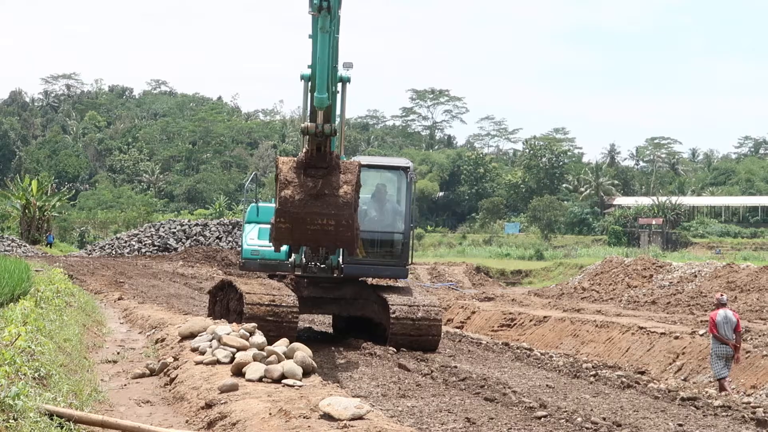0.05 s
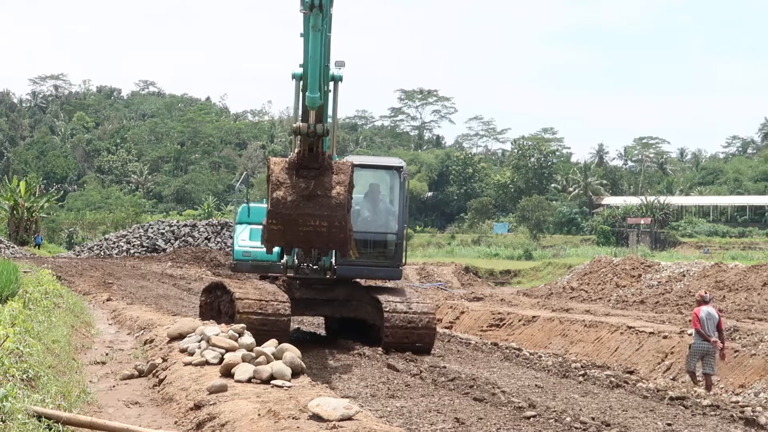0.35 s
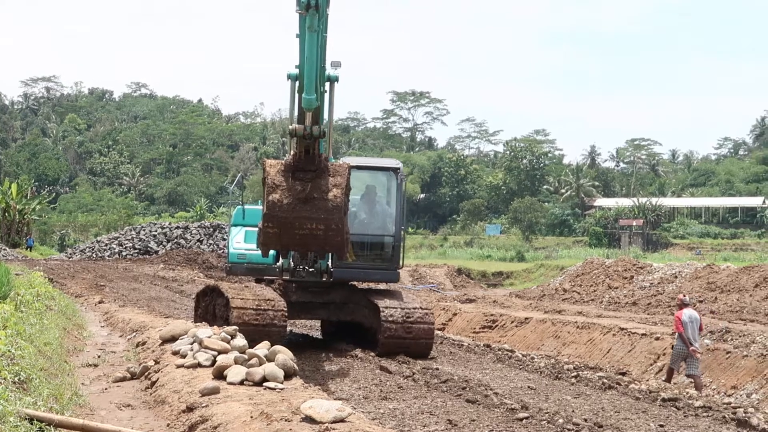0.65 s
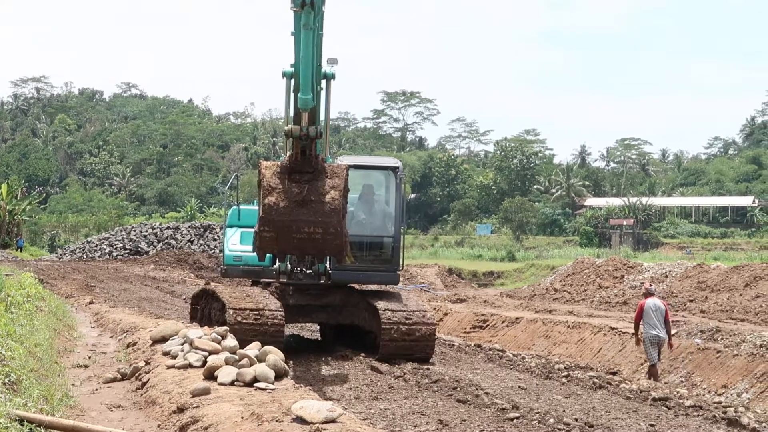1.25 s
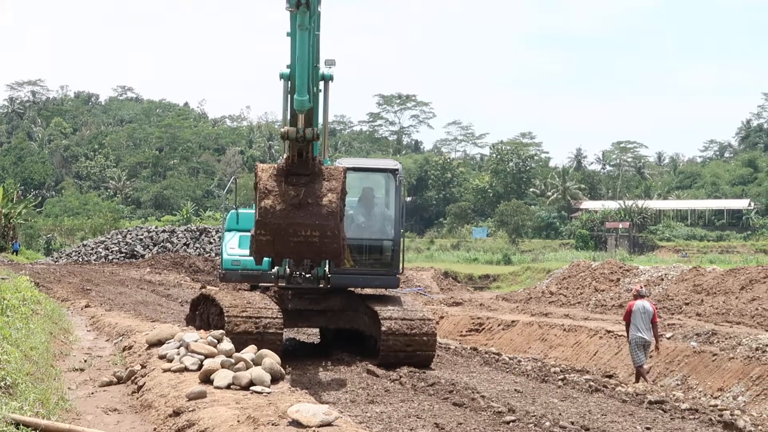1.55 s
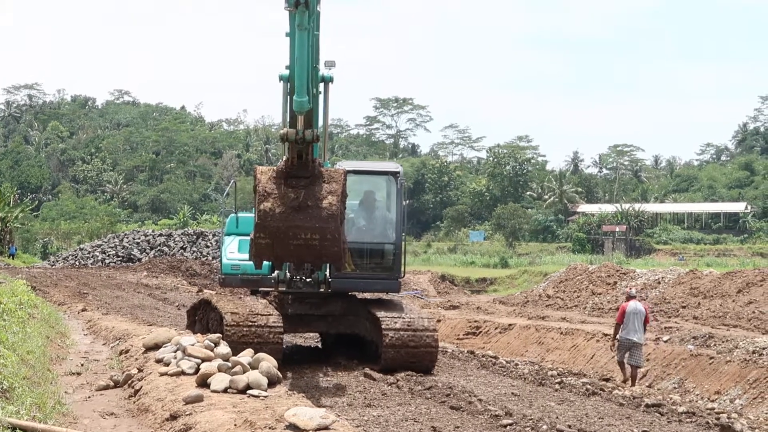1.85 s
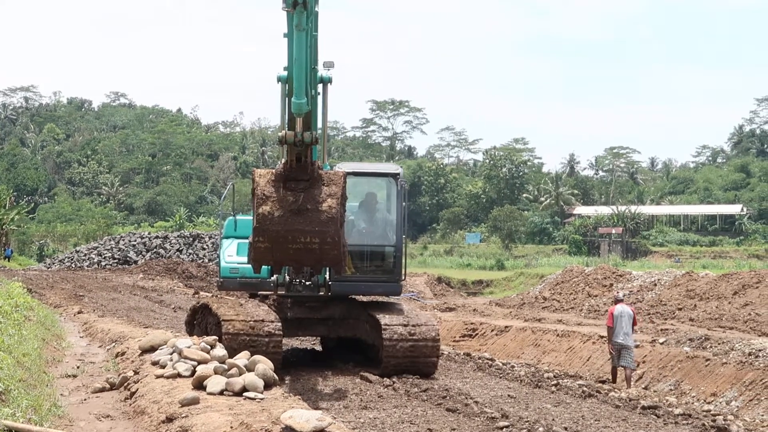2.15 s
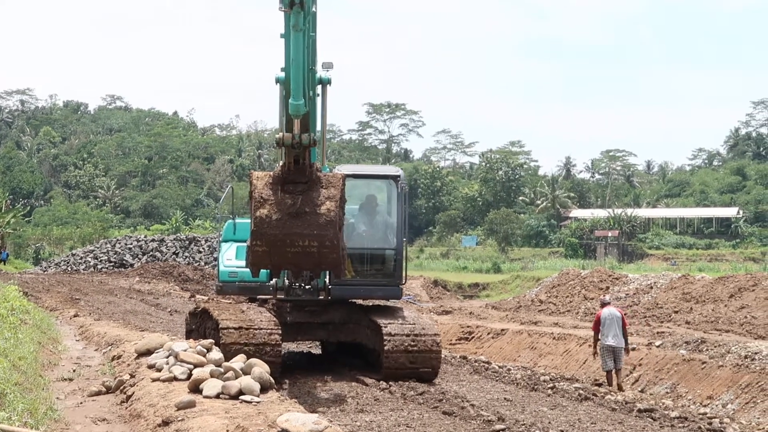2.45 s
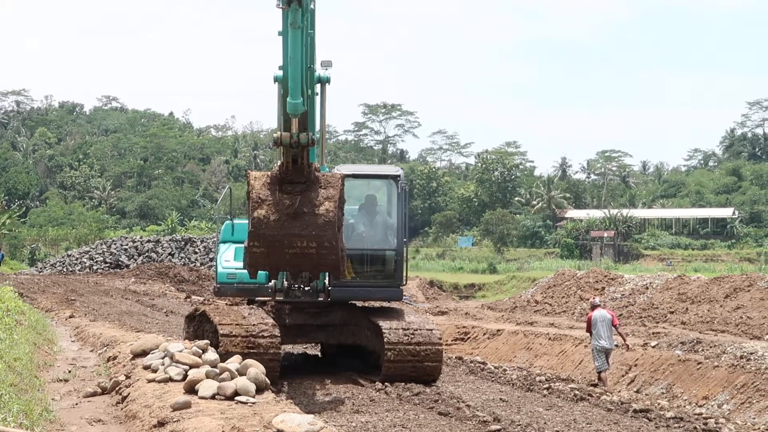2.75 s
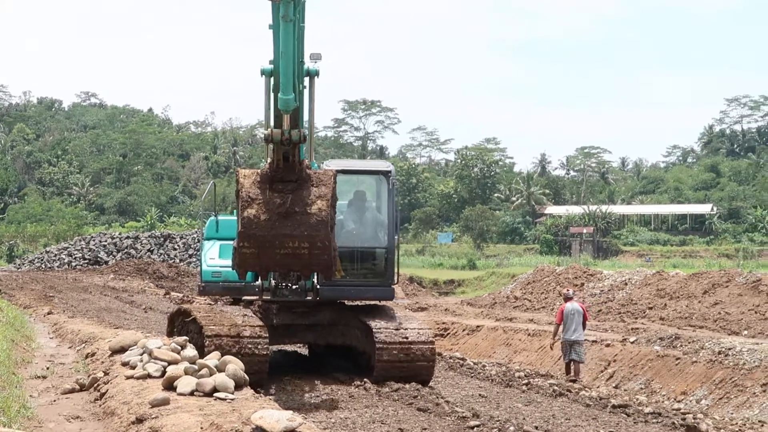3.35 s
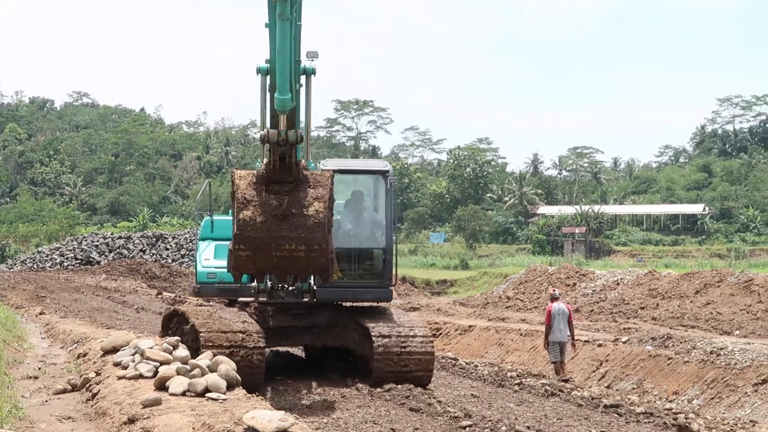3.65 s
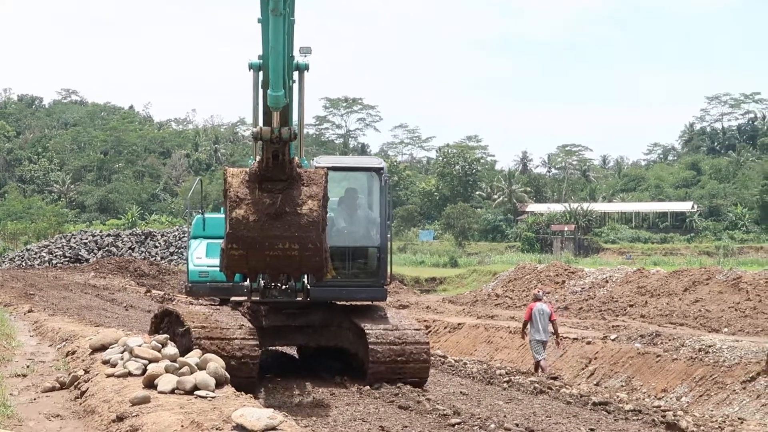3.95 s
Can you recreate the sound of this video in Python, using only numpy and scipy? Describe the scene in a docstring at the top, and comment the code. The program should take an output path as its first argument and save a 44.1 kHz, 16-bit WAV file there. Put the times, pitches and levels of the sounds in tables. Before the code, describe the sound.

Excavator rumbling along outdoors, its gears whining and steel tracks clattering, with one heavy thump.

```python
"""A steady diesel rumble, two gliding gear tones and rattling tracks: an excavator crawls over dirt.
The rumble throbs with each firing; each gear tone follows the speed of its track drive. Links clatter,
rollers grind, one squeals briefly, and steel shoes knock on stones and crush them. A heavy thump of the
undercarriage makes the gain control duck, and dull clanks of the links follow.
Light wind rumbles on the microphone."""
import sys
import numpy as np
from scipy import signal
from scipy.fft import rfft, irfft, next_fast_len
from scipy.io import wavfile
from scipy.ndimage import uniform_filter1d, minimum_filter1d, map_coordinates

SR = 44100
rng = np.random.default_rng(int(sys.argv[2]) if len(sys.argv) > 2 else 0)


def master(y):
    """Save y as 16-bit WAV."""
    cut = np.clip(np.atleast_2d(y).T, -1, 1)
    pcm = np.round(cut * 32767)  # scale
    wavfile.write(sys.argv[1], SR, pcm.astype(np.int16))


N = 176400


def amp(db):
    """Decibels to gain."""
    return 10 ** (np.asarray(db) / 20)


def unit(x):
    """Scale to rms 1."""
    return x / np.sqrt(np.mean(x ** 2) + 1e-20)


def along(points, hz):
    """Interpolate (Hz, value) points on a log frequency axis."""
    f, v = np.transpose(points)
    return np.interp(np.log(hz + 1), np.log(f + 1), v)


def clock():
    """Sample times in seconds."""
    return np.arange(N) / SR


def curve(rows):
    """Join (seconds, value) points by straight lines."""
    return np.interp(clock(), *np.transpose(rows))


def wobble(knots_per_s):
    """Smooth random curve, rms about 1."""
    return map_coordinates(rng.standard_normal(1024), [clock() * knots_per_s], mode="wrap")


def phase_of(hz):
    """Running phase of a frequency curve."""
    return 2 * np.pi * np.cumsum(hz) / SR


def tone(phase, db):
    """Sine at the given rms level."""
    return np.sqrt(2) * amp(db) * np.sin(phase)


def filtered(x, response):
    """Apply a frequency response by FFT."""
    size = next_fast_len(N + SR // 2)
    return irfft(rfft(x, size) * response(np.fft.rfftfreq(size, 1 / SR)), size)[..., :N]


def rush(spectrum, drive=1, correlation=None):
    """Stereo noise of rms 1, shaped in time by drive, then coloured."""
    # Each row: frequency in Hz, left-right correlation.
    default_correlation = [(30, .993), (70, .995), (150, .994), (300, .99), (550, .985), (1000, .94),
                           (1600, .82), (2100, .92), (4000, .96)]

    def response(hz):
        angle = np.arccos(np.clip(along(correlation or default_correlation, hz), -1, .9995)) / 2
        return amp(along(spectrum, hz)) * [np.cos(angle), np.sin(angle)]

    mid, side = filtered(rng.standard_normal((2, N)) * drive, response)
    return unit(np.array([mid + side, mid - side]))


def contacts(per_s, spread_db, life_s):
    """Envelope of many small random contacts."""
    onsets = rng.random(N) < per_s / SR
    power = onsets * amp(spread_db * np.minimum(rng.standard_normal(N), 2)) ** 2
    return np.sqrt(signal.lfilter([1], [1, -np.exp(-2 / (life_s * SR))], power))


def burst(start_s, db, t60_s, attack_s):
    """Envelope of one blow: quick rise, exponential decay."""
    t = np.maximum(clock() - start_s, 0)
    return amp(db - 60 * t / t60_s) * (1 - np.exp(-t / attack_s))


def ring(start_s, db, modes, attack_s):
    """Decaying modes of a struck body."""
    t = clock() - start_s
    return sum(burst(start_s, db + mode_db, t60_s, attack_s) * np.sin(2 * np.pi * hz * t)
               for hz, mode_db, t60_s in modes)


def hiss():
    """Faint, very wide hiss that swells as the machine nears."""
    # Each row: frequency in Hz, relative density in dB.
    spectrum = [(900, -9), (2200, -4), (3750, 3.5), (4200, 0.5), (5600, 2.5), (7600, -3), (10500, -1),
                (12000, -5), (14000, -7), (15200, -23.5)]
    # Each row: time in seconds, level in dB.
    level_db = [(.1, -55.5), (.8, -54.5), (1.3, -54), (2, -53.5), (2.5, -49.5), (3.1, -50.5), (3.45, -54.5),
                (3.75, -53), (4, -53.5)]
    return amp(curve(level_db) + .5 * wobble(10)) * rush(spectrum, correlation=[(1000, -1)])


def wind():
    """Short gusts buffet the microphone."""
    # Each row: time in seconds, level in dB.
    gust_db = [(0, -35), (.2, -35), (.33, -16), (.5, -43.5), (.8, -38), (1.3, -41.5), (2, -44),
               (2.7, -38.5), (4, -44.5)]
    # Each row: frequency in Hz, relative density in dB.
    spectrum = [(10, -24), (30, -9.5), (48, 6), (90, -0.5), (250, -32.5), (1000, -72), (4000, -120)]
    return amp(curve(gust_db) + 2.5 * wobble(14)) * rush(spectrum)


def crunches():
    """Stones crack under the tracks in brief, gritty swells."""
    # Each row: centre in seconds, half length in seconds, level in dB.
    stones = [(0.46, 0.0047, -42), (0.523, 0.016, -30), (0.715, .012, -39), (1.423, 0.0029, -36),
              (1.908, 0.006, -39), (1.928, 0.006, -37.5), (3.35, 0.013, -39.5), (3.777, 0.009, -32)]
    # Each row: frequency in Hz, relative density in dB.
    grit = [(300, -28), (900, 7), (1280, 3), (2600, 1), (3600, -1), (6000, -12.5), (9000, -16),
            (14000, -32.5)]
    swell = sum(amp(db) * np.exp(-.5 * ((clock() - s) / half_s) ** 2) for s, half_s, db in stones)
    return swell * rush(grit, contacts(per_s=3000, spread_db=6.5, life_s=0.0029))


def squeal():
    """A dry roller rubs on its pin: a faint, rough tone that rises and sags."""
    # Each row: time in seconds, pitch in Hz, level in dB.
    glide = [(.6, 725, -74), (.64, 746.6, -34), (.68, 776, -35), (.74, 854, -39), (.79, 810, -35.5),
             (.83, 785, -68.5)]
    s, hz, db = np.transpose(glide)
    pitch_hz = np.interp(clock(), s, hz) * (1 + 0.015 * wobble(120))
    return tone(phase_of(pitch_hz), np.interp(clock(), s, db) + 1.5 * wobble(60))


def knocks():
    """Steel track shoes hit stone: a dry, broad clack and a short ring."""
    # Each row: start in seconds, level in dB, pitch factor.
    strikes = [(0.453, -32.5, 1.5), (3.344, -25.5, 1.1), (3.665, -32, 1.3), (3.768, -23.5, 1),
               (3.78, -28.5, 0.92)]
    # Each row: mode in Hz at pitch factor 1, relative level in dB, T60 in seconds.
    shoe = [(1297, 4, 0.045), (1100, -2, 0.03), (1700, -6.5, 0.023), (2230, -10, 0.03), (2960, -15, 0.024),
            (3800, -13.5, 0.09)]
    # Each row: frequency in Hz, relative density in dB.
    clack = [(400, -10.5), (950, 10), (1400, 3.5), (2000, -6), (2700, -4.5), (3300, -11.5), (4000, -16.5),
             (5000, -24.5), (9000, -29), (14000, -52.5)]
    rings = blows = 0
    for s, db, pitch in strikes:
        modes = [(hz * pitch, mode_db, t60_s) for hz, mode_db, t60_s in shoe]
        rings += ring(s, db, modes, attack_s=0.0004)
        blows += burst(s, db - 2.5, t60_s=0.088, attack_s=.002)
    return rings + blows * rush(clack)


def clanks():
    """Links drop against each other and ring: dull through mud, brighter where bare steel meets."""
    # Each row: start in seconds, level in dB, brightness in dB.
    drops = [(0.711, -18.5, -2), (0.741, -13, -3.5), (0.774, -18, 7), (0.809, -9, -3), (.84, -9, -4),
             (.862, -7, -7), (0.877, -8, -1.5), (.9, -4.5, -7.5), (.968, -2, -11.5), (0.981, -1.5, -1.5),
             (1.004, 3.5, -3.5), (1.021, -12.5, 7.5), (1.094, -10.5, 2), (1.115, -13.5, -10),
             (2.173, -13, -5), (3.771, -18, -2)]
    # Each row: mode in Hz, relative level in dB, T60 in seconds.
    link_modes = [(352.2, -3.5, .1), (278, -8, .08)]
    # Each row: frequency in Hz, relative density in dB.
    muddy = [(80, -25), (190, -1.5), (270, -0.5), (355, 5.5), (460, -2.5), (620, -2.5), (780, -24.5),
             (1500, -39.5), (6000, -81)]
    steel = [(400, -30.5), (750, -2.5), (950, -1.5), (1150, 0.5), (1600, 1), (2000, -16.5), (3000, -35.5),
             (6000, -50), (12000, -77)]
    rings = dull_power = bright_power = 0
    for s, db, bright_db in drops:
        rings += ring(s, db, link_modes, attack_s=.001)
        power = burst(s, db, t60_s=.14, attack_s=0.0004) ** 2
        dull_power += power
        bright_power += power * amp(bright_db) ** 2
    dull = amp(-3.5) * np.sqrt(dull_power) * rush(muddy)
    bright = amp(-19) * np.sqrt(bright_power) * rush(steel)
    return rings + dull + bright


def thumps():
    """Blows of the undercarriage ring the low modes of the frame."""
    # Each row: start in seconds, level in dB.
    blows = [(0.735, -5), (0.788, -8.5), (0.804, -8.5), (.823, 11.5)]
    # Each row: mode in Hz, relative level in dB, T60 in seconds.
    frame_modes = [(140.2, -1.5, 0.11), (182.6, -4, .06), (100, -17, 0.048)]
    return sum(ring(s, db, frame_modes, attack_s=0.0022) for s, db in blows)


def tracks(firing_phase):
    """Noise pulses with the engine; links clatter and ring steel panels; rollers grind on the chain."""
    # Each row: frequency in Hz, relative density in dB.
    rattle_spectrum = [(330, -25), (620, -6), (760, -5.5), (1000, -3.5), (1600, -8.5), (2000, -10.5),
                       (2450, -14.5), (2850, -19), (3750, -20), (4200, -25.5), (5400, -27), (7200, -33),
                       (9000, -39.5), (12000, -88.5)]
    roller_spectrum = [(200, -32.5), (370, -2.5), (480, 3.5), (540, -2.5), (680, -10.5), (900, -20),
                       (2000, -66.5), (6000, -110)]
    # Each row: time in seconds, level in dB.
    rattle_db = [(.1, -31), (.8, -32.5), (1.3, -33.5), (1.7, -31), (2.05, -32), (2.45, -30.5), (2.7, -30.5),
                 (3.3, -34), (3.7, -31.5), (4, -33.5)]
    grind_db = [(.1, -26.5), (.7, -28.5), (1.15, -36.5), (1.7, -29), (2.05, -37.5), (2.2, -30),
                (2.7, -29.5), (3.2, -40.5), (4, -46)]
    # Each row: resonance in Hz, bandwidth in Hz, relative level in dB.
    panel_modes = [(1307, 18, -54), (1611, 16, -43.5), (2454, 19, -47.5), (3520, 39, -66)]
    pulsing = amp(-2.5) * rush(rattle_spectrum, 1 + 0.037 * np.cos(firing_phase))
    hits = contacts(per_s=170, spread_db=2, life_s=0.005)
    rattle_gain = amp(curve(rattle_db) + .7 * wobble(14))
    clatter = amp(-8.5) * rush(rattle_spectrum, hits)
    shake = filtered(hits * rng.standard_normal(N), lambda hz: 1 / (1 + (hz / 5000) ** 4))
    panels = 0
    for hz, width_hz, db in panel_modes:
        ringing = filtered(shake, lambda f: 1j * f * width_hz / (hz * hz - f * f + 1j * f * width_hz))
        panels += amp(db + 2 * wobble(8)) * unit(ringing)
    grind = amp(curve(grind_db)) * rush(roller_spectrum, hits)
    return rattle_gain * (pulsing + clatter) + amp(-5.5) * panels + grind


def gears():
    """Two mesh tones, each following the speed of its track drive."""
    # Each row: time in seconds, pitch in Hz.
    low_hz = [(0.1, 335.6), (0.35, 328.8), (0.7, 335.9), (1.2, 344.3), (1.5, 335), (1.77, 312), (1.95, 320),
              (2.1, 324), (2.33, 317), (2.56, 333.5), (2.7, 332), (2.85, 327), (3.2, 318.5), (3.43, 312),
              (3.58, 316), (3.72, 312), (4, 312.5)]
    high_hz = [(.1, 598), (.35, 590), (.7, 614.8), (1.2, 617.4), (1.6, 594), (1.8, 564.5), (2.05, 590),
               (2.3, 576.8), (2.42, 582), (2.54, 607.7), (2.8, 604), (3, 589), (3.25, 579.3), (3.5, 571.5),
               (3.64, 574.5), (3.76, 568), (4, 575)]
    # Each row: time in seconds, level in dB.
    low_db = [(.1, -23.5), (.48, -29.5), (.65, -23.5), (1.2, -30), (1.6, -24.5), (1.75, -21.5), (2.2, -26),
              (2.45, -24), (2.7, -17), (2.8, -21.5), (3.12, -16.5), (3.35, -21), (3.42, -26.5), (3.58, -23),
              (3.85, -24.5), (4, -32.5)]
    high_db = [(.1, -35), (.4, -31.5), (.7, -37), (1.45, -45), (1.67, -31), (1.8, -29), (1.92, -43),
               (2.22, -42), (2.29, -27), (2.42, -30), (2.55, -29), (2.68, -33), (2.8, -26), (2.93, -21),
               (3.06, -21.5), (3.105, -25), (3.128, -38), (3.158, -20.5), (3.26, -22), (3.36, -27.5),
               (3.495, -30), (3.53, -21.5), (3.62, -22.5), (3.76, -18.5), (3.82, -21.5), (4, -23)]
    low_phase = phase_of(curve(low_hz) * (1 + 0.0017 * wobble(25)))
    high_phase = phase_of(curve(high_hz) * (1 + 0.0011 * wobble(20)))
    low = tone(low_phase, curve(low_db) + 0.82 * wobble(14))
    high = tone(high_phase, curve(high_db) + 1.5 * wobble(11))
    return low + high


def engine(firing_phase, drone_hz=99.1):
    """Diesel: exhaust harmonics, a wavering drone and a rumble that throbs with each firing."""
    # Each row: multiple of the firing rate, level in dB.
    harmonics = [(1, -27.5), (2, -30.5), (3, -31.5)]
    # Each row: time in seconds, level in dB.
    drone_db = [(0, -21), (1, -32), (1.8, -25), (2.2, -22), (2.6, -27), (3.2, -21.5), (4, -31.5)]
    # Each row: frequency in Hz, relative density in dB.
    rumble = [(25, -28), (50, -12), (78, -9.5), (110, -4), (180, 0), (215, -5.5), (285, -3.5), (360, -13),
              (480, -19.5), (580, -21.5), (720, -27), (1200, -39.5), (3000, -88.5)]
    exhaust = sum(tone(k * firing_phase, db + 1.8 * wobble(8)) for k, db in harmonics)
    drone_phase = phase_of(drone_hz * (1 + .012 * wobble(7)))
    drone = tone(drone_phase, curve(drone_db) + 2 * wobble(4.8))
    throb = (1 + .25 * np.cos(firing_phase)) * amp(0.29 * wobble(28))
    return exhaust + drone + amp(-17.5) * rush(rumble, throb)


def scene():
    """The excavator, a little to the right, in light wind."""
    # Each row: frequency in Hz, left minus right in dB.
    balance_db = [(60, .2), (350, 0), (540, -2), (840, -1), (1300, -3.0), (2020, -2.3), (3140, -2.0)]
    firing_hz, left_lag_s = 61.72, .00004
    firing_phase = phase_of(firing_hz * (1 + 0.0037 * wobble(4)))
    mix = engine(firing_phase) + gears() + tracks(firing_phase)
    mix = mix + squeal() + thumps() + clanks() + knocks() + crunches() + wind()
    sides = np.array([[.5], [-.5]])

    def pan(hz):
        return amp(along(balance_db, hz) * sides) * np.exp(-2j * np.pi * hz * left_lag_s * sides)

    return filtered(mix, pan) + hiss()


def gain_control(x, ceiling_db=-5, detect_s=0.0099, hold_s=0.46, recover_db_per_s=8):
    """A level over the ceiling pulls the gain down at once; it holds, then recovers steadily."""
    power = np.abs(uniform_filter1d(np.mean(x ** 2, axis=0), int(detect_s * SR)))
    need_db = np.minimum(ceiling_db - 10 * np.log10(power + 1e-12), 0)
    half = int(hold_s * SR / 2)
    held_db = minimum_filter1d(need_db, 2 * half + 1, origin=half, mode="constant")
    ramp_db = recover_db_per_s * clock()
    return x * amp(np.minimum.accumulate(held_db - ramp_db) + ramp_db)


def limiter(x, peak_db=-1):
    """A quick, smooth gain dip holds single peaks under full scale."""
    need = np.minimum(amp(peak_db) / (np.abs(x).max(0) + 1e-9), 1)
    held = minimum_filter1d(need, size=256)
    return x * uniform_filter1d(uniform_filter1d(held, size=128), size=128)


def record(dry):
    """Gain control, limiter, abrupt cut-in and band limit."""
    start_s, fade_s, top_hz = 0.082, 0.0031, 15200
    opening = np.clip((clock() - start_s) / fade_s, 0, 1)
    return filtered(limiter(gain_control(dry)) * opening, lambda hz: hz < top_hz)


dry = scene()
out = record(dry)
master(out)
```